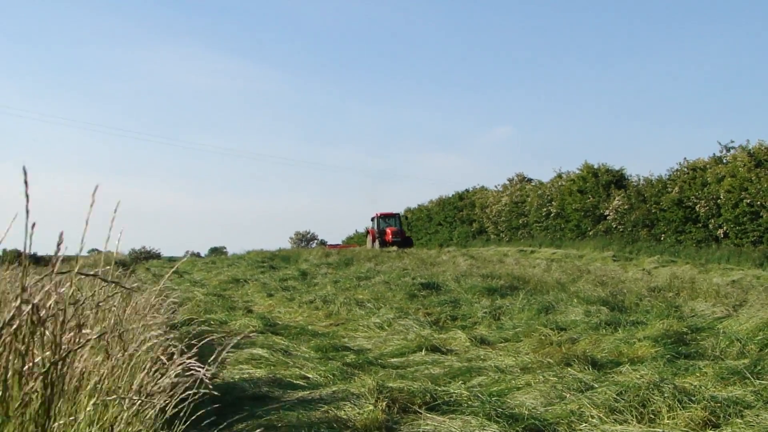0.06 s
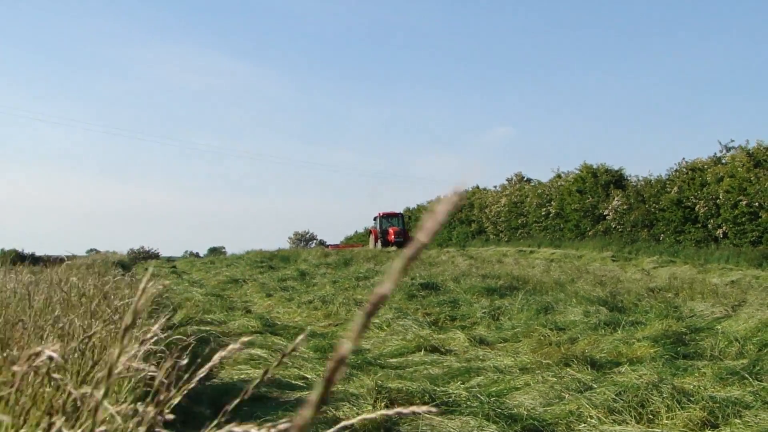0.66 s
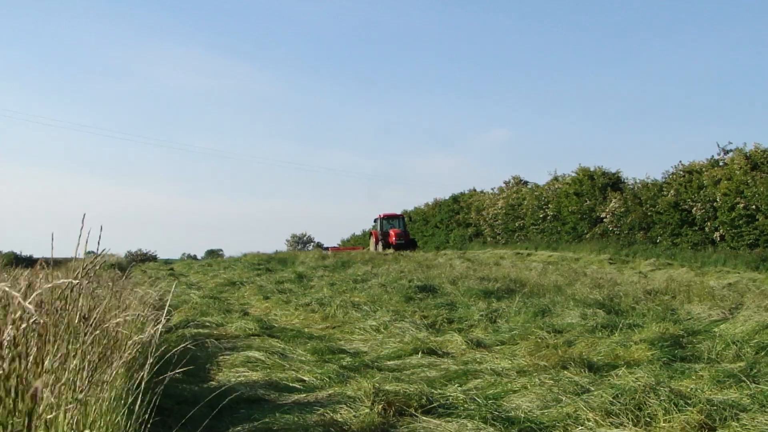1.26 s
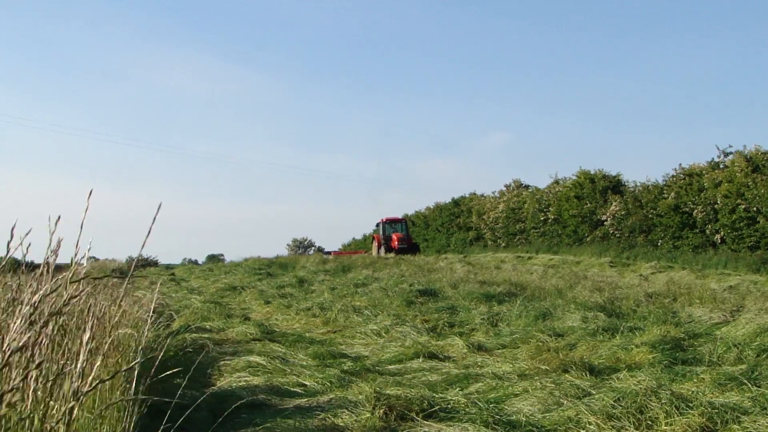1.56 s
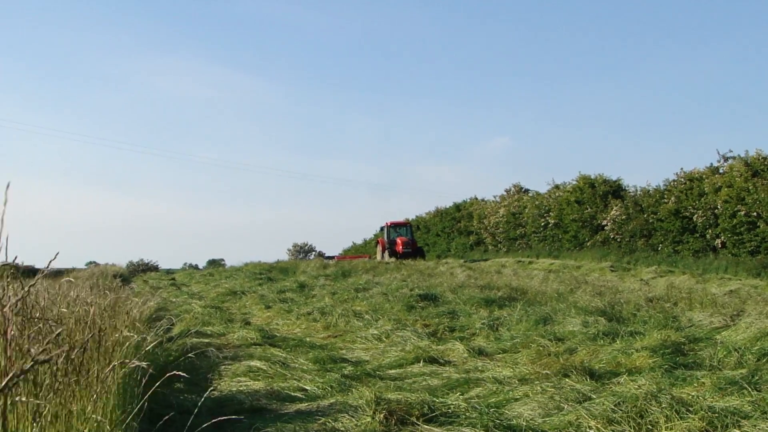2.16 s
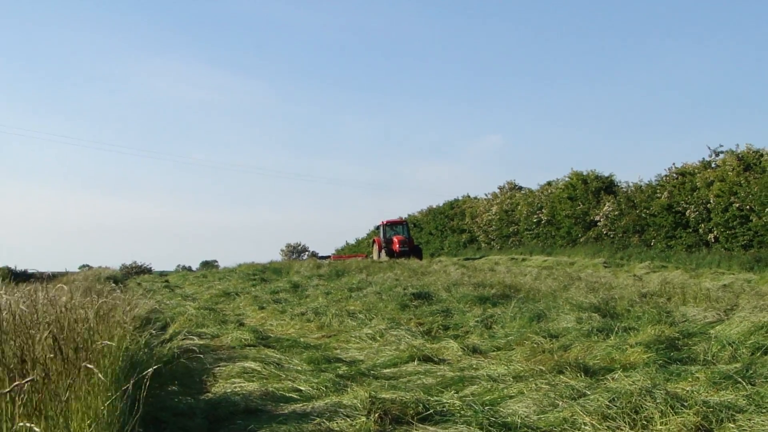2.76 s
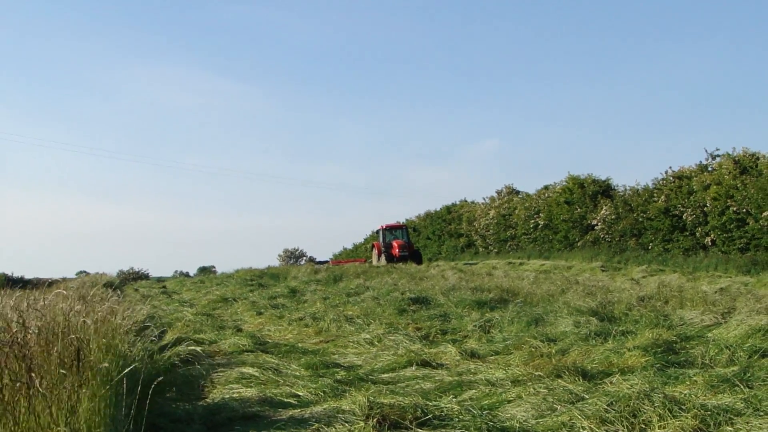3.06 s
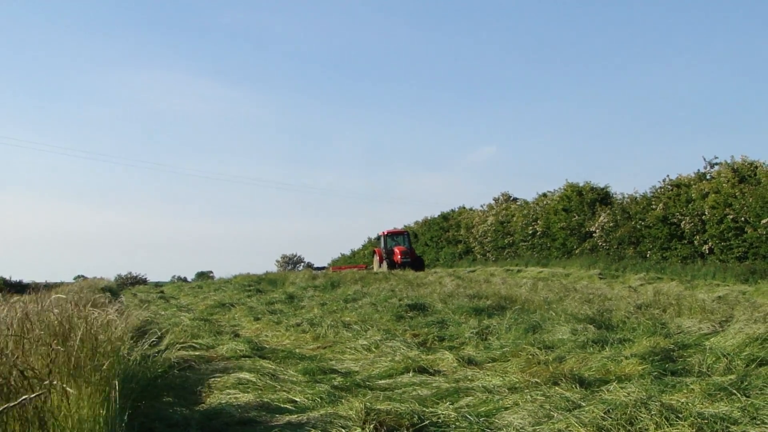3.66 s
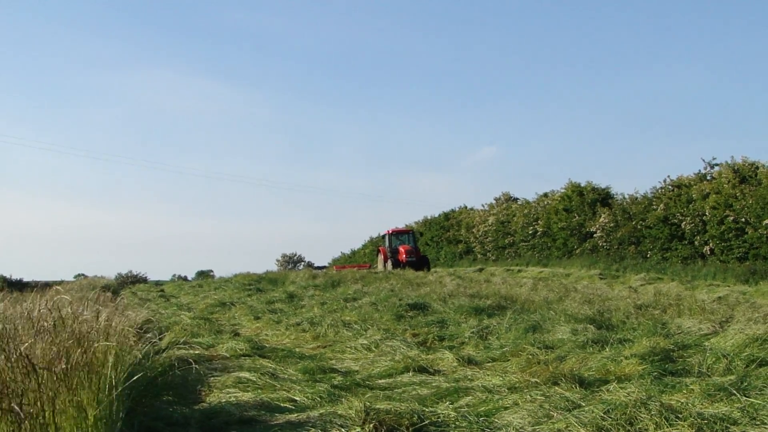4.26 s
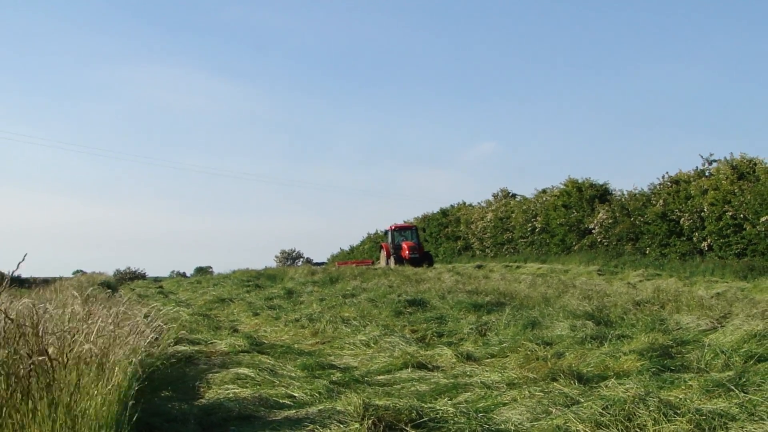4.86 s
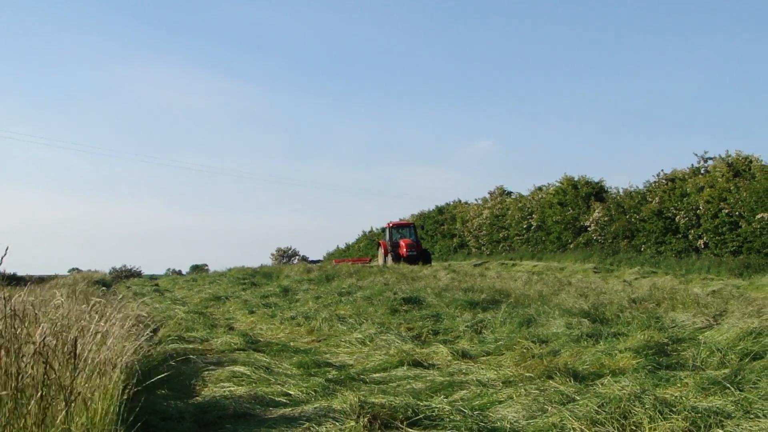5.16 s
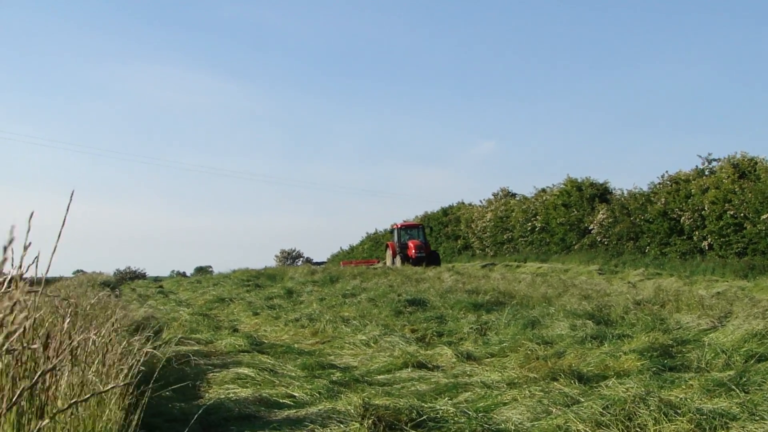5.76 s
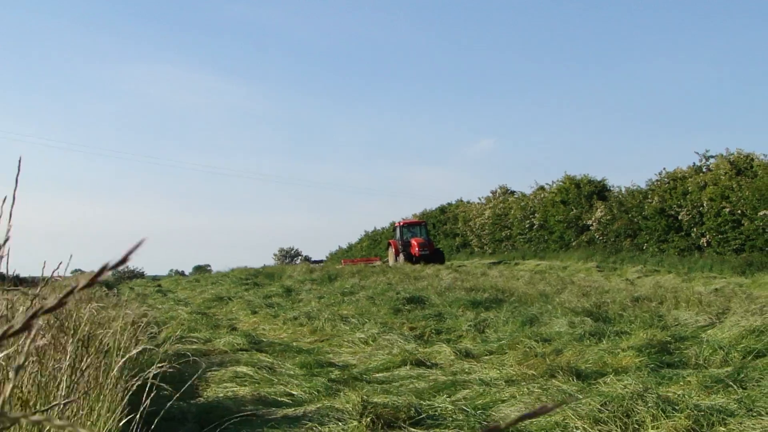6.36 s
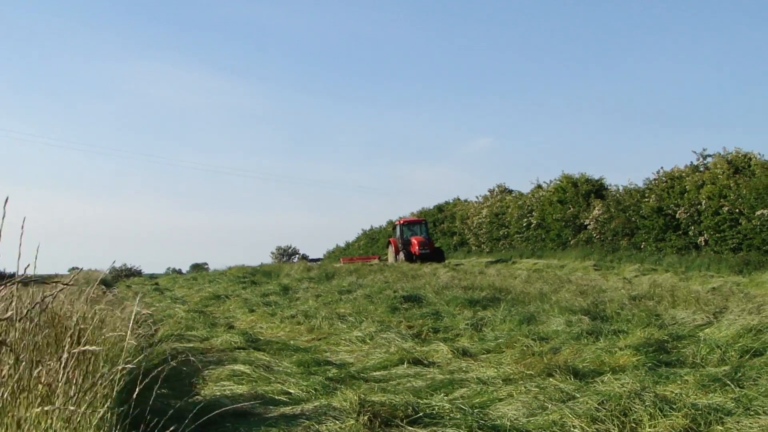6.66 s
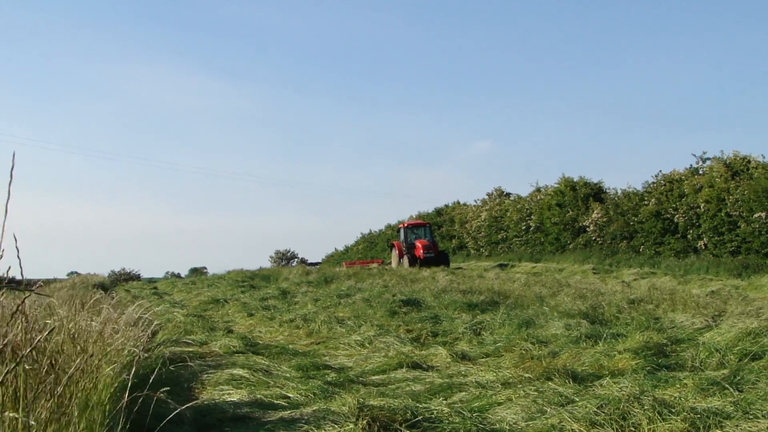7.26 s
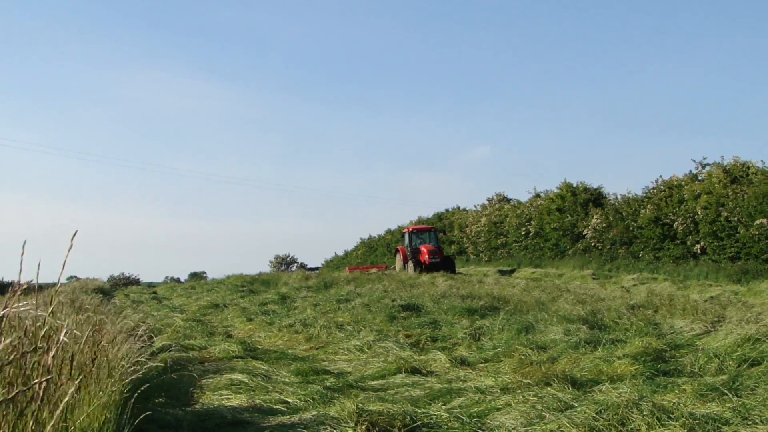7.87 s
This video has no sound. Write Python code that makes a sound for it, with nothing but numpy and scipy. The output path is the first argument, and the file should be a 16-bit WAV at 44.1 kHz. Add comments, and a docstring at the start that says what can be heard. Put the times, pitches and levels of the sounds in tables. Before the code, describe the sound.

A tractor with a disc mower works in a distant, open hayfield, heard through a small stereo microphone. From the start the blades hum and roar at a steady pitch, steel discs ring, the diesel clatters and cut grass hisses faintly. A slight hollow ring fades over the first two seconds. From about 0.7 seconds strong gusts rumble on the microphone, with hard thumps between 1.1 and 1.7 seconds. From 1.4 seconds a ringing gear whine gradually grows as the tractor approaches. The wind relaxes between 2 and 3 seconds, when the hiss and disc ring brighten with light clinks. From 3.2 to 5.7 seconds heavy gusts and buffets return, and the machine dips and wavers beneath them. Near 6 seconds the wind eases and the mower swells back, running clearly with a few small clinks until 8 seconds.

```python
"""A tractor with a disc mower works up a distant hayfield. From the start its blades hum and roar as they
chop the air, the steel discs ring, the diesel clatters and cut grass hisses; a hollow ring fades early on.
Within a second strong gusts begin to buffet the two ports of a small stereo microphone. From 1.4 s the
tractor comes over a rise and its gear ring grows. Midway the machine's sound ducks under the strong gusts;
near 6 s they ease and it swells back."""
import sys
import numpy as np
from scipy import signal
from scipy.fft import rfft, irfft, next_fast_len
from scipy.io import wavfile
from scipy.ndimage import uniform_filter1d, minimum_filter1d

SR = 44100
rng = np.random.default_rng(int(sys.argv[2]) if len(sys.argv) > 2 else 0)


def output_pcm(signal):
    """Save a mono or channel-first signal as 16-bit PCM at the path in sys.argv[1].

    Samples are clipped to [-1, 1] before scaling.
    """
    pcm = np.clip(np.atleast_2d(signal).T, -1, 1) * 32767
    wavfile.write(sys.argv[1], SR, np.round(pcm).astype(np.int16))


N = 353241
TIME = np.arange(N) / SR
BINS_HZ = np.maximum(np.fft.rfftfreq(next_fast_len(N), 1 / SR), 1)

# mower shaft speed: (time [s], rotation rate [Hz])
SHAFT_SPEED = [(0, 45.9), (.5, 46.0), (1.0, 46.6), (1.5, 46.1), (1.95, 46.7), (2.65, 46.0), (3.0, 46.6),
               (3.6, 46.1), (5.8, 46.3), (6.5, 46.5), (6.95, 45.95), (7.6, 46.6), (8, 46.15)]
# blade harmonics: (order [multiple of shaft rate], level [dB])
HUM_ORDERS = [(3, -44), (5, -51.5), (6, -45), (12, -58.5)]
# gear mesh and sidebands: (order [multiple of gear shaft rate], level [dB re gear ring])
MESH_ORDERS = [(33, -15), (34, -6.5), (35, -13), (36, -12.5)]
# engine and drive line whines: (order [multiple of crank rate], level [dB re blade roar])
WHINE_ORDERS = [(21, -18), (25.7, -13), (31.2, -12.5)]
# noise spectra of the sources: (frequency [Hz], relative density [dB])
ROAR_SPECTRUM = [(25, -62), (65, -37), (120, -4), (230, -7), (330, -13.5), (470, -13.5), (600, -7),
                 (700, -2.5), (850, 4), (1000, 7), (1150, 3), (1290, 4.5), (1500, -7), (1900, -36)]
DISC_SPECTRUM = [(2300, -47), (2740, -9.5), (2910, 1.5), (3130, -4), (3400, 0), (3650, -11), (4000, -15.5),
                 (4800, -11.5), (6500, -39.5)]
GEAR_CASE_SPECTRUM = [(1050, -36), (1260, -4.5), (1420, -4), (1510, -3), (1575, -3), (1670, -2), (1730, -6),
                      (1800, -27), (2100, -82)]
CLATTER_SPECTRUM = [(1600, -33.5), (1850, -6), (2080, -1.5), (2320, 0), (2630, -6.5), (3200, -4.5),
                    (3900, -7), (4800, -13), (7000, -25), (12000, -65)]
HISS_SPECTRUM = [(3000, -14), (5000, 8.5), (6200, 5.5), (7000, -1.5), (7700, 3), (8800, -2), (11600, -15.5),
                 (12600, -20)]
HOLLOW_SPECTRUM = [(1130, -21), (1290, 17), (1470, -12), (1730, 16.5), (1860, 3.5), (2150, 13.5),
                   (2600, -46)]
# loudest clinks of the discs: (time [s], level [dB])
DISC_CLINKS = [(.63, -24), (.789, -24), (2.44, -22), (2.56, -21), (2.85, -20), (2.91, -20), (6.365, -21),
               (6.397, -20), (6.486, -19), (7.688, -21), (7.971, -22)]
# fade of the hollow ring: (time [s], level [dB])
HOLLOW_FADE = [(.7, -27), (1.5, -37), (3, -50)]
# rows for blade roar, gear ring, engine clatter, disc ring and grass hiss:
# (base level [dB], share of overall level [ratio], approach gain [dB], thick crop gain [dB])
PART_MIX = [(-26.5, .72, -1.5, -0.5), (-31.6, 0.86, 11, -.5), (-26.5, 1.04, -0.3, .5),
            (-25, 1.32, 0.6, 4.8), (-48, 1.24, 3.5, 10.5)]
# patches of thick crop: (middle [s], length [s], thickness [0-1])
CROP_PATCHES = [(.08, 0.43, 0.25), (1.5, 1.25, 0.55), (2.663, 1.5, 0.9), (6.507, 0.43, .7)]
# swells of the gear ring: (middle [s], length [s], gain [dB])
GEAR_RING_SWELLS = [(.78, 0.18, 3.5), (2.25, 0.33, 3.5), (3.56, 0.73, 1.5), (4.83, .3, 2), (5.895, 0.13, 3),
                    (7.047, 1.3, 1.5)]
# overall level of the machine: (time [s], level [dB])
MACHINE_LEVEL = [(0, -1), (1.3, -3.5), (1.48, -5), (1.6, -3), (2.02, -0.5), (2.11, -3.5), (2.25, -1.5),
                 (2.92, -.7), (3.4, -5.5), (3.68, -5), (3.82, -10.7), (4.2, -12.5), (4.38, -4),
                 (4.68, -6.5), (4.95, -4), (5.05, -9), (5.38, -5.5), (5.65, -13), (5.81, -3.5), (6.52, 0),
                 (8, -0.8)]
# likeness of the machine at the two ports: (frequency [Hz], correlation [ratio, capped at 0.99 in use])
PORT_LIKENESS = [(430, 0.8), (700, 9), (1200, 0.7), (1750, 1.2), (2300, 0.9), (5000, .82), (8500, 0.52),
                 (11000, 0.9)]
# its stereo balance: (frequency [Hz], left minus right [dB])
PORT_BALANCE = [(400, 3.5), (700, 6), (1300, 4), (1900, 2.5), (2900, -4), (3300, -1.5), (3700, 4.5),
                (5500, 2.5), (8000, 0.5)]
# eddy noise at unit flow speed: (frequency [Hz], relative density [dB])
EDDY_SPECTRUM = [(20, -42), (45, -41), (90, -13.5), (140, -4.5), (240, 2.5), (400, -4.5), (600, -16.5),
                 (900, -25), (2500, -68)]
# gusts on the ports: (start [s], length [s], level [dB])
PORT_GUSTS = [(0.217, 0.87, -32), (0.736, 0.12, -21.5), (1.133, 0.062, -17), (1.278, .2, -19),
              (1.679, 0.076, -17), (1.8, .12, -22.5), (2.238, .19, -30.5), (2.55, .52, -38.5),
              (3.212, .4, -21.5), (3.678, 0.54, -19.5), (4.43, .28, -23.5), (4.832, 0.64, -22),
              (5.41, .23, -19.5), (5.874, 0.22, -30.5), (6.97, 0.023, -27.5), (7.6, 0.22, -39)]
# single hard buffets: (time [s], level [dB])
HARD_BUFFETS = [(1.139, -8), (1.188, -11), (1.407, -10), (1.442, -7), (1.673, -10), (1.712, -11),
                (3.711, -10), (3.779, -12), (4.987, -13), (5.428, -11), (5.484, -13)]


def blades(turns, roar_db, disc_db):
    """Amplitude modulation: three blades a turn chop the air, and the grass sets the steel discs ringing."""
    chop = strokes(3 * turns, [1.2, -1, 0], scatter_db=0.97, depth_db=0.5)
    roar = from_db(roar_db) * far_noise(chop, ROAR_SPECTRUM)
    tufts = strokes(17.5 * TIME + .35 * drift(3), [0], scatter_db=.8, depth_db=3.3)  # uneven crop feed
    ring_gain = np.hypot(from_db(disc_db - 0.5) * tufts, bursts(DISC_CLINKS, length_s=0.036))
    return roar + ring_gain * far_noise(chop, DISC_SPECTRUM)


def blade_hum(turns, gear_db):
    """Periodic forcing of the air radiates shaft harmonics, which here swell with the gear ring."""
    hum = tones(turns, HUM_ORDERS, waver_db=2.0, blur_rad=0.61, blur_hz=8.5, port_rad=0.71, pan_db=3.5)
    return from_db(0.61 * (gear_db - gear_db.mean())) * hum


def gearbox(turns, gear_db, belt_slip=.005):
    """Forced vibration: meshing teeth ring the case and sound a tone with sidebands a shaft rate apart."""
    rattle = strokes(2 * turns, [.8, -.8], scatter_db=0.64, depth_db=0.4)
    case = from_db(-1.5) * far_noise(rattle, GEAR_CASE_SPECTRUM)
    gear_turns = turns * (1 - belt_slip)
    mesh = tones(gear_turns, MESH_ORDERS, waver_db=1.8, blur_rad=.85, blur_hz=7, port_rad=.5, pan_db=2.5)
    return from_db(gear_db) * (case + mesh)


def diesel(crank, throb_db, clatter_db, roar_db):
    """Impact excitation: block and panels clatter with the crank, while the drive line whines."""
    rattle = far_noise(from_db(0.35 * drift(90)), CLATTER_SPECTRUM)
    whines = tones(crank, WHINE_ORDERS, waver_db=2, blur_rad=0.73, blur_hz=9.1, port_rad=0.35, pan_db=0.5)
    return from_db(clatter_db + throb_db + 2.5) * rattle + from_db(roar_db) * whines


def grass(hiss_db):
    """Incoherent addition: countless stalks, cut and brushed together, merge into one hiss."""
    return from_db(hiss_db + 3.0) * far_noise(1, HISS_SPECTRUM)


def hollow_ring():
    """Resonance: noise in a few narrow bands sounds hollow; it fades to a faint trace."""
    return from_db(in_time(HOLLOW_FADE)) * far_noise(1, HOLLOW_SPECTRUM)


def wind(wind_db, lump_db=3.5):
    """Turbulence: a lumpy flow shifts its power to faster eddies in gusts, with single hard buffets."""
    eddies = from_db(wind_db - .5) * rms_one(from_db(lump_db * drift(59)))
    fast_share = 1 / (1 + from_db(-18.5 - wind_db) ** 2)
    slow = eddies * np.sqrt(1 - fast_share)
    fast = np.hypot(eddies * np.sqrt(fast_share), bursts(HARD_BUFFETS, length_s=0.013))
    return on_ports(slow, speed=0.9, likeness=-0.77) + on_ports(fast, speed=1.38, likeness=-0.79)


def on_ports(eddies, speed, likeness):
    """Eddy pressure drives the ports mostly in antiphase; frequency scales with relative flow speed."""
    pair = resonate(eddies, [(hz * speed, db) for hz, db in EDDY_SPECTRUM], likeness)
    return pair * np.sqrt(np.mean(eddies ** 2)) / np.std((pair[0] - pair[1]) / 2)


def gust_level(breeze_db=-51, attack_db_per_s=276, release_db_per_s=128):
    """Exponential growth and decay: each gust rises, holds and sinks back into the breeze; in dB."""
    level_db = breeze_db
    for start_s, length_s, db in PORT_GUSTS:
        before_s = np.maximum(start_s - TIME, 0)
        after_s = np.maximum(TIME - start_s - length_s, 0)
        level_db = np.maximum(level_db, db - attack_db_per_s * before_s - release_db_per_s * after_s)
    return level_db


def part_levels(approach_start_s=1.44, approach_length_s=2.63):
    """Gains add in dB: overall level, the approach over the rise and crop load set each part's level."""
    machine_db, = in_time(MACHINE_LEVEL)
    approach = np.clip((TIME - approach_start_s) / approach_length_s, 0, 1)
    crop = sum(thickness * swell(s, length_s) for s, length_s, thickness in CROP_PATCHES)
    roar_db, gear_db, *others = [db + share * machine_db + approach_db * approach + crop_db * crop
                                 for db, share, approach_db, crop_db in PART_MIX]
    roar_db += 2.5 * swell(middle_s=0.49, length_s=1.8)  # fuller at first
    gear_db += sum(db * swell(s, length_s) for s, length_s, db in GEAR_RING_SWELLS)
    return [roar_db, gear_db, *others]


def tones(turns, orders, waver_db, blur_rad, blur_hz, port_rad, pan_db):
    """Scintillation: turbulent air shakes the level and phase of each multiple of a rotation."""
    pair, sides = 0, np.array([[.5], [-.5]])
    for order, db in orders:
        phase = 2 * np.pi * (order * turns + rng.random()) + blur_rad * drift(blur_hz)
        gain = from_db(db + waver_db * drift(1.4) + sides * pan_db)
        pair = pair + gain * np.sqrt(2) * np.cos(phase + sides * port_rad)
    return pair


def far_noise(drive, spectrum):
    """Partial coherence: noise from the distant machine reaches both ports much alike."""
    return resonate(drive, spectrum, at_bins(PORT_LIKENESS), at_bins(PORT_BALANCE))


def resonate(drive, spectrum, likeness, balance_db=0):
    """Source and filter: stereo noise follows `drive` and takes on a spectrum; the mid has rms 1."""
    size = next_fast_len(N)
    mid, side = rfft(rng.standard_normal((2, N)) * drive, size)
    likeness = np.clip(likeness, -.99, .99)
    sides = np.array([[1], [-1]])
    excitation = np.sqrt(1 + likeness) * mid + sides * np.sqrt(1 - likeness) * side
    response = from_db(at_bins(spectrum) + sides * balance_db / 2)
    pair = irfft(excitation * response, size)[:, :N]
    return pair / np.std(pair.mean(axis=0))


def strokes(count, pattern_db, scatter_db, depth_db):
    """Cyclic modulation: one swell per cycle of `count`, its strength set by pattern and chance."""
    cycles = np.arange(int(count[-1]) + 2)
    strength_db = np.resize(pattern_db, len(cycles)) + scatter_db * rng.standard_normal(4096)[cycles]
    ripple_db = depth_db * np.cos(2 * np.pi * count)
    return rms_one(from_db(np.interp(count, cycles, strength_db) + ripple_db))


def bursts(events, length_s):
    """Short swells at the given times and levels."""
    return sum(from_db(db) * swell(s, length_s) for s, db in events)


def swell(middle_s, length_s):
    """A raised cosine, from 0 to 1 and back."""
    return np.cos(np.pi * np.clip((TIME - middle_s) / length_s, -.5, .5)) ** 2


def drift(rate_hz):
    """Random fluctuation of unit rms, low-passed at `rate_hz`."""
    hop, settle = 40, 2000
    pole = np.exp(-2 * np.pi * hop * rate_hz / SR)
    noise = rng.standard_normal(N // hop + settle + 2)
    slow = signal.lfilter([1], [1, -2 * pole, pole * pole], noise)[settle:]
    return np.interp(np.arange(N) / hop, np.arange(len(slow)), rms_one(slow))


def in_time(rows):
    """Each column of a curve at every sample."""
    times, *columns = np.transpose(rows)
    return [np.interp(TIME, times, column) for column in columns]


def at_bins(points):
    """A table interpolated over log frequency."""
    hz, value = np.transpose(points)
    return np.interp(np.log(BINS_HZ), np.log(hz), value)


def from_db(db):
    """Decibels to gain."""
    return 10 ** (np.asarray(db) / 20)


def rms_one(x):
    """Scale to unit rms."""
    return x / np.sqrt(np.mean(x ** 2) + 1e-20)


def scene(mean_crank_hz=32.32):
    """Superposition: engine and mower turn and shimmer together; wind adds at the ports."""
    shaft_hz, = in_time(SHAFT_SPEED)
    turns = np.cumsum(shaft_hz) / SR
    crank = turns * mean_crank_hz / shaft_hz.mean()
    shimmer_db = 0.82 * drift(18.4)
    roar_db, gear_db, clatter_db, disc_db, hiss_db = part_levels() + shimmer_db
    # four-stroke: every other turn is stronger
    throb_db = 20 * np.log10(strokes(crank, [.5, -.5], scatter_db=1.0, depth_db=1.54))
    mower = blade_hum(turns, gear_db) + blades(turns, roar_db, disc_db + throb_db)
    mower += gearbox(turns, gear_db + 0.45 * throb_db)
    ring = hollow_ring()
    engine = diesel(crank, throb_db, clatter_db, roar_db)
    return mower + ring + engine + grass(hiss_db) + wind(gust_level())


def record(dry, ceiling_db=-3.0, release_db_per_s=45, cutoff_hz=11950):
    """Peak limiting: everything ducks after the hardest buffets; a low-pass cuts the top."""
    over_db = np.maximum(20 * np.log10(np.abs(dry).max(axis=0) + 1e-9) - ceiling_db, 0)
    duck_db = np.maximum.accumulate(over_db + release_db_per_s * TIME) - release_db_per_s * TIME
    gain = uniform_filter1d(minimum_filter1d(from_db(-duck_db), size=89), size=89)  # 2 ms smoothing
    low_pass = signal.ellip(12, .2, 80, cutoff_hz, fs=SR, output="sos")
    return signal.sosfilt(low_pass, dry * gain)


dry = scene()
out = record(dry)
output_pcm(out)
```